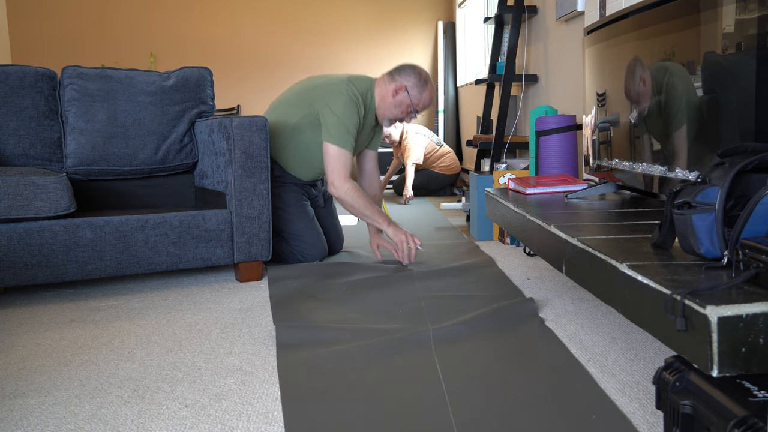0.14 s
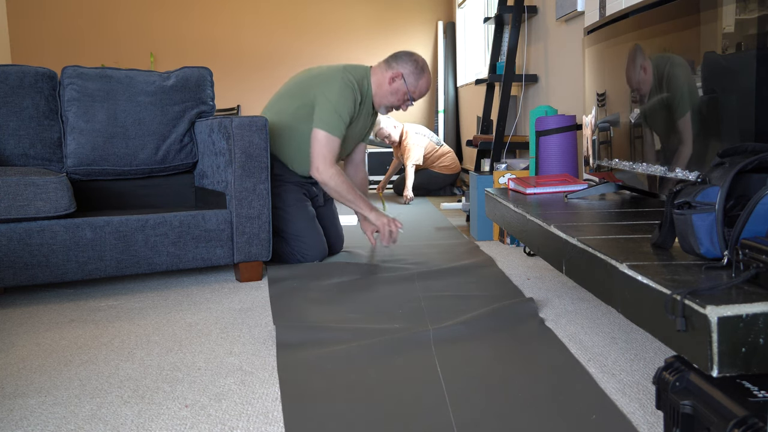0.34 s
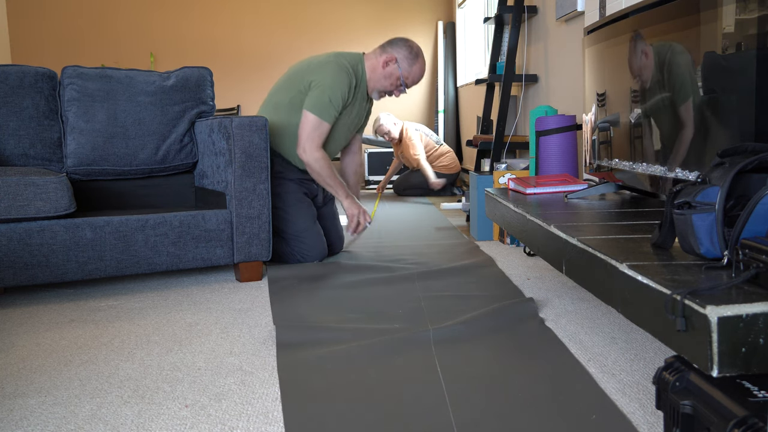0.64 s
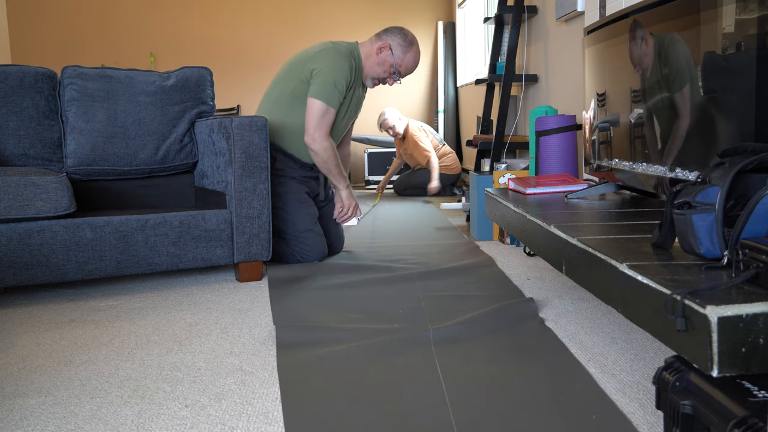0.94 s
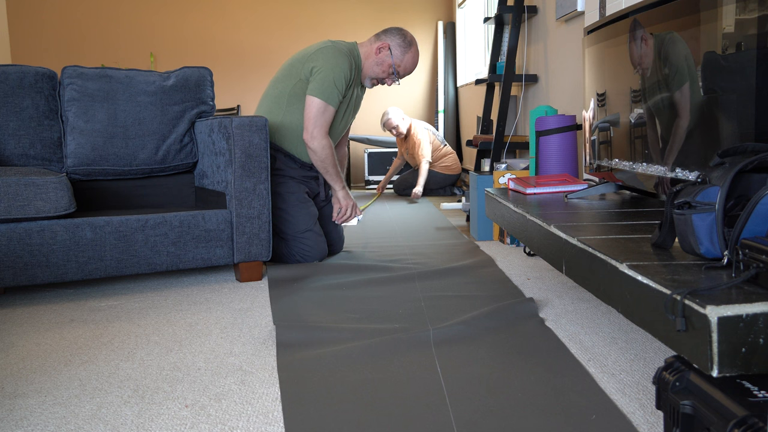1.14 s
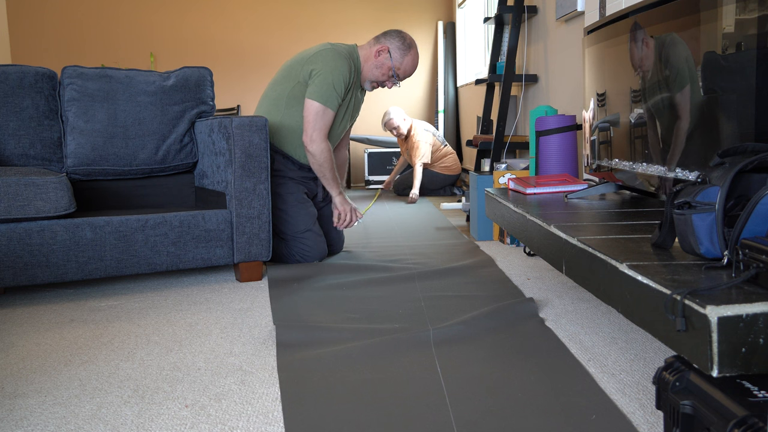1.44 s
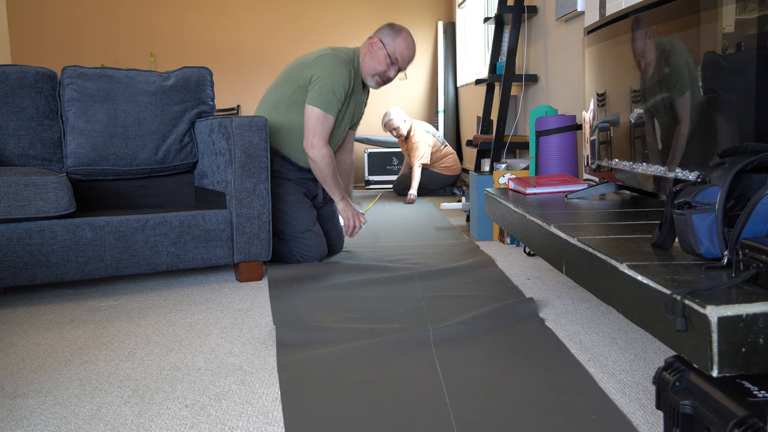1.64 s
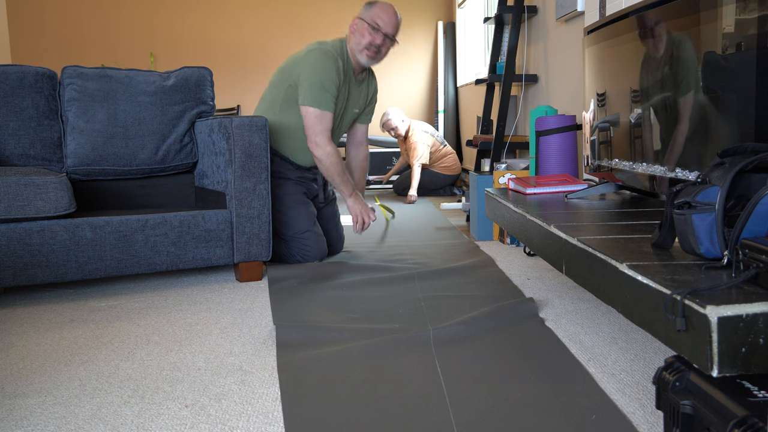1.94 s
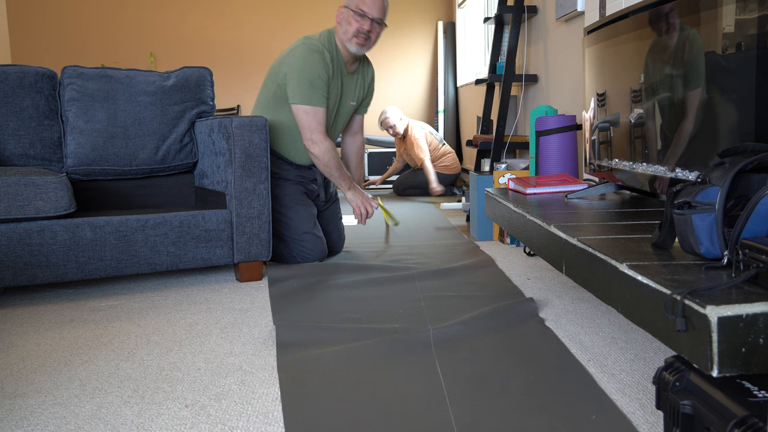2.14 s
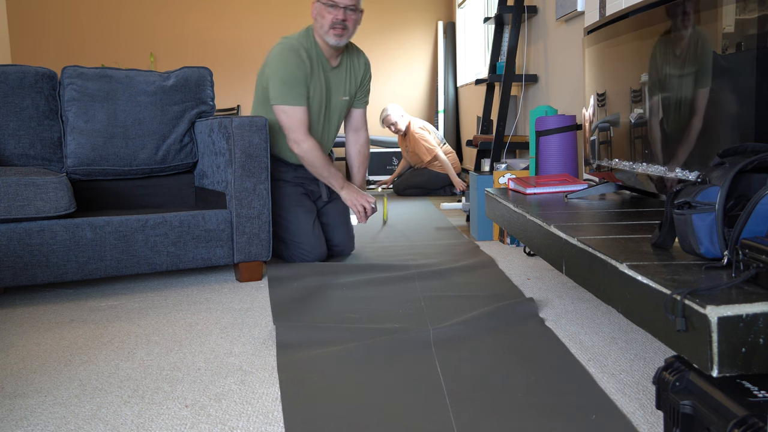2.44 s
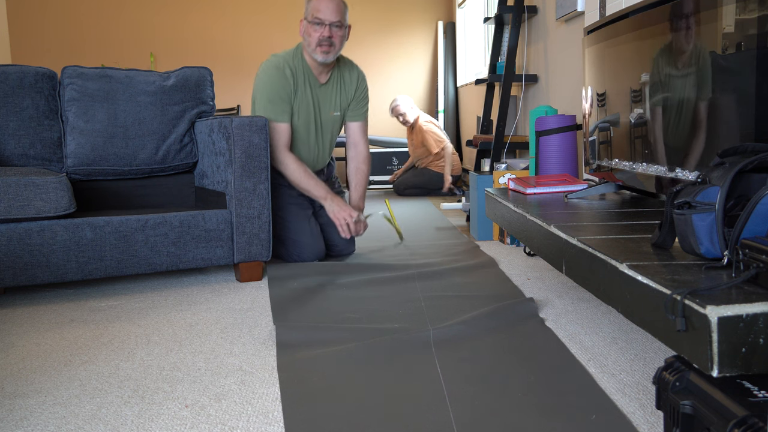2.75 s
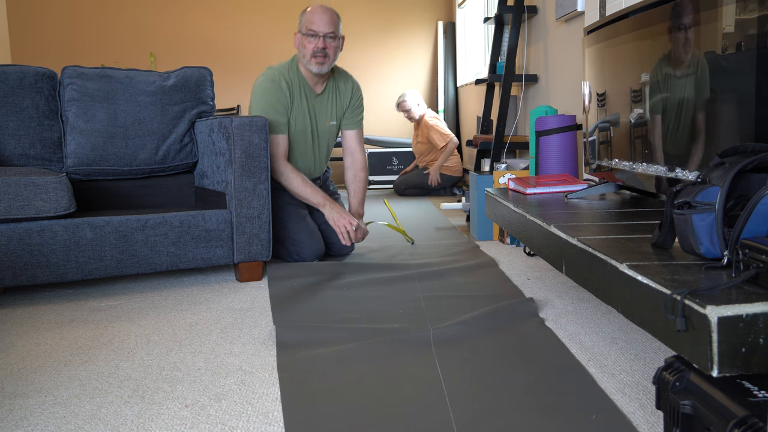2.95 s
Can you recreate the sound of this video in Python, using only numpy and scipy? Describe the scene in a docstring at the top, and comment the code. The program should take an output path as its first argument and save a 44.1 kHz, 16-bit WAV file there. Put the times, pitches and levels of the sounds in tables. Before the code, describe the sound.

Stiff canvas rustles close to the microphone in a furnished room, starting quietly, swishing sharply with a brief squeak, easing off, then crackling and scraping in repeated strong strokes before fading.

```python
"""Heavy, stiff canvas is handled on a living-room floor: first a few short rubs, one a strong bright swish.
Each is a dense run of tiny slips: low rub, scrape, bright crinkle and fine fizz (coloured noise and impulses),
with sharp noise-burst snaps. An early slide squeaks thinly: a sine in spurts. From 1.5 s on come full strokes
with much harder snaps. Throughout, soft scuffs and thin whistling rubs (swells of band noise) fall between them;
the furnished room answers over faint room noise."""
import sys
import numpy as np
from scipy import signal
from scipy.fft import rfft, irfft, next_fast_len
from scipy.io import wavfile
from scipy.ndimage import uniform_filter1d, minimum_filter1d, map_coordinates

SR = 44100
rng = np.random.default_rng(int(sys.argv[2]) if len(sys.argv) > 2 else 0)


def transcribe(u):
    """Save the signal u as a 16-bit wav file named by the first command-line argument.

    u: samples, shape (n,) or (channels, n), limited to [-1, 1]; the rate is SR.
    q: integer samples, one column per channel.
    """
    v = np.clip(np.atleast_2d(u).T, -1, 1)
    q = np.round(v * 32767).astype(np.int16)
    wavfile.write(sys.argv[1], SR, q)


N = 136710
FLUTTER_KNOTS_PER_S = 190  # shared by the grip and the squeak's shimmer
STFT_SAMPLES = 256


def amp(db):
    """Decibels to gain."""
    return 10 ** (np.asarray(db) / 20)


def unit(x):
    """Scale to rms 1."""
    return x / np.sqrt(np.mean(x ** 2) + 1e-20)


def along(points, hz):
    """Read (Hz, value) points on a log-frequency axis."""
    point_hz, values = np.transpose(points)
    return np.interp(np.log(hz + 1), np.log(point_hz + 1), values)


def curves(rows):
    """One value per sample for each column after the time."""
    times_s, *columns = np.transpose(rows)
    return [np.interp(np.arange(N) / SR, times_s, column) for column in columns]


def wobble(knots_per_s):
    """A smooth random curve through normally distributed knots."""
    knots = rng.standard_normal(N // 20)
    return map_coordinates(knots, [np.arange(N) * knots_per_s / SR], mode="wrap")


def swell(centre_s, width_s):
    """A smooth Gaussian rise and fall."""
    return np.exp(-.5 * ((np.arange(N) / SR - centre_s) / width_s) ** 2)


def filtered(x, response):
    """Multiply the zero-padded spectrum by a complex response of frequency."""
    size = 2 * next_fast_len(N)
    spectrum = rfft(x, size) * response(np.fft.rfftfreq(size, 1 / SR))
    return irfft(spectrum, size)[..., :N]


def coloured(x, colour):
    """Causal minimum-phase filter of unit power gain shaped by (Hz, dB) points."""
    def response(hz):
        cepstrum = irfft(np.log(unit(amp(along(colour, hz)))))
        half = len(cepstrum) // 2
        cepstrum[1:half] *= 2
        cepstrum[half + 1:] = 0
        return np.exp(rfft(cepstrum))
    return filtered(x, response)


def strokes():
    """Slips and smooth friction under an uneven grip sound in four registers."""
    # Each row: time in s, levels in dB of crinkle, scrape, fizz and low rub; one list per rub or stroke.
    short_rub_rows = [
        [(0.0, -47, -44.5, -54, -55.5), (0.072, -66, -54.5, -80, -57), (0.222, -43.5, -49, -40, -49),
         (0.305, -47.5, -47.5, -54, -59)],
        [(0.325, -18, -30, -21.5, -48.5), (0.398, -28.5, -37.5, -37, -50), (0.43, -25.5, -37.5, -27.5, -50),
         (0.53, -35.5, -44.5, -47, -51.5), (0.78, -48.5, -48, -56, -54.5)],
        [(0.84, -54, -59.5, -64, -81), (0.96, -46, -53.5, -50.5, -65), (1.06, -53.5, -59.5, -60, -81),
         (1.215, -49, -56, -53.5, -62)],
        [(1.29, -47, -43.5, -43, -67), (1.304, -28.5, -35, -31.5, -44), (1.35, -33.5, -39, -37, -48.5),
         (1.51, -40, -42, -61, -42.5)],
    ]
    stroke_rows = [
        [(1.535, -29, -33.5, -47, -52), (1.551, -26.5, -38, -45, -45), (1.585, -23.5, -35.5, -27, -43),
         (1.715, -23, -30.5, -30.5, -42.5), (1.781, -36.5, -37, -44, -47.5), (1.84, -43.5, -40, -48, -47.5)],
        [(1.875, -33, -42.5, -37.5, -50), (1.971, -29.5, -35.5, -30, -47), (2.019, -16, -31, -23, -41.5),
         (2.107, -16, -28, -21.5, -34.5), (2.163, -25, -35.5, -32.5, -46), (2.261, -38, -42, -43, -45.5),
         (2.352, -32.5, -40, -38, -49.5)],
        [(2.372, -23.5, -31.5, -33, -42), (2.432, -23, -29.5, -26.5, -39), (2.5, -24.5, -32.5, -30, -43),
         (2.522, -27, -34, -32, -56), (2.544, -18, -24.5, -20, -39.5), (2.624, -15.5, -26, -25.5, -38),
         (2.72, -25.5, -30, -37, -35.5)],
        [(2.76, -20, -26.5, -27, -35.5), (2.792, -14, -20.5, -19.5, -35.5), (2.86, -19.5, -23, -25, -43),
         (3.008, -42, -41.5, -52, -54), (3.026, -31, -41.5, -34, -47.5), (3.09, -26, -37, -31, -54)],
    ]
    # Register colours; each row: frequency in Hz, relative level in dB.
    crinkle = [(200, -82), (2500, -51), (4500, -7.5), (5800, -2.5), (7500, 0.5), (9000, 0), (10000, -5),
               (11200, -16), (15000, -16.5)]
    scrape = [(100, -67), (600, -32.5), (1200, -17.5), (1750, 0), (3200, 0), (4200, 2), (5100, 2),
              (6200, -5.5), (9000, -26.5)]
    fizz = [(200, -88), (7000, -47), (10000, -1.5), (14000, -6.5), (15800, -7)]
    low_rub = [(50, -75), (130, -38), (250, -17.5), (400, -5), (650, 5.5), (800, 3), (930, 7.5),
               (1250, 7.5), (1700, 12), (3000, -22)]
    smooth_db, grip_flutter_db, own_flutter_db = -3, 0.98, 0.8
    own_knots_per_s = 44.44

    levels_db = curves([row for stroke in [*short_rub_rows, *stroke_rows] for row in stroke])
    grip_db = grip_flutter_db * wobble(FLUTTER_KNOTS_PER_S)
    out = np.zeros(N)
    for level_db, colour in zip(levels_db, (crinkle, scrape, fizz, low_rub)):
        friction = slips() + amp(smooth_db) * rng.standard_normal(N)
        flutter_db = grip_db + own_flutter_db * wobble(own_knots_per_s)
        layer = coloured(friction * amp(flutter_db), colour)
        out += amp(level_db) * bending(layer)
    return out


def slips():
    """A dense random train of tiny slips: impulses of uneven size and random sign."""
    rate_per_s, spread_db = 2400, 1
    sizes = amp(spread_db * np.clip(rng.standard_normal(N), -2, 2))
    signs = rng.choice([-1, 1], N)
    return unit(sizes * signs * (rng.random(N) < rate_per_s / SR))


def bending(x):
    """The colour drifts in patches, and one resonance follows the bend of the material."""
    # Path of the resonance; each row: time in s, frequency in Hz.
    bend_path = [(.4, 7500), (.58, 10000), (.95, 9000), (1.15, 6840), (1.72, 6400), (1.88, 8400),
                 (2.09, 8500), (2.24, 9300), (2.38, 6900), (2.74, 6600), (2.9, 6200), (3.08, 8800)]
    bend_db, bend_octaves, patchy_db = 2.5, .16, 1

    hz, t, spectra = signal.stft(x, SR, nperseg=STFT_SAMPLES)
    patches = uniform_filter1d(rng.standard_normal(spectra.shape), 4, 0)
    patches = unit(uniform_filter1d(patches, 24, 1))
    resonance_hz = np.interp(t, *np.transpose(bend_path))
    octaves = np.log2((hz[:, None] + 1) / resonance_hz)
    gain_db = patchy_db * patches + bend_db * np.exp(-.5 * (octaves / bend_octaves) ** 2)
    return unit(signal.istft(spectra * amp(gain_db), SR, nperseg=STFT_SAMPLES)[1][:N])


def snaps():
    """Each snap of the stiff material is a bright noise burst with exponential decay."""
    # Each row: start in s, relative level in dB (trim_db is added).
    snap_rows = [(0.5545, -22), (0.641, -26), (0.68, -28), (0.777, -31), (1.1727, -31), (1.263, -23),
                 (1.3008, -12.5), (1.312, -16), (1.5275, -5), (1.5772, -4), (1.6162, -10), (1.6244, -4),
                 (1.711, -6), (2.0127, -6), (2.0977, -3), (2.366, -5), (2.5176, -3.5), (2.5387, -6),
                 (2.626, -3.5), (2.7382, -7.5), (2.8478, -6), (3.0245, -20.5)]
    # Snap colour; each row: frequency in Hz, relative level in dB.
    snap_colour = [(120, -84), (1500, -13), (4000, -8), (6000, 6.5), (7500, 10.5), (11000, -2),
                   (15500, -17)]
    trim_db, t60_s = -7.5, 0.041

    out = np.zeros(N + SR)
    t = np.arange(SR // 10) / SR
    for start_s, level_db in snap_rows:
        envelope = amp(level_db + trim_db - 60 * t / t60_s)
        out[round(start_s * SR):][:len(t)] += envelope * rng.standard_normal(len(t))
    return coloured(out[:N], snap_colour)


def squeak():
    """A sliding edge sticks and slips in spurts; its thin pitch starts sharp and settles."""
    # Each row: centre in s, half length in s, peak level in dB before shimmer.
    spurt_rows = [(.441, .014, -33), (.502, .017, -39), (.556, .014, -44.5), (.603, .009, -41),
                  (.668, .014, -47.5)]
    settled_hz, sharp_hz, settle_s = 1660, 30, .07
    jitter_ratio, jitter_knots_per_s, shimmer_db = 0.0022, 144, 1.5

    age_s = np.maximum(np.arange(N) / SR - spurt_rows[0][0], 0)
    hz = settled_hz + sharp_hz * np.exp(-age_s / settle_s)
    hz = hz * (1 + jitter_ratio * wobble(jitter_knots_per_s))
    phase = 2 * np.pi * np.cumsum(hz) / SR
    spurts = sum(amp(level_db) * swell(centre_s, width_s) for centre_s, width_s, level_db in spurt_rows)
    return np.sin(phase) * spurts * amp(shimmer_db * wobble(FLUTTER_KNOTS_PER_S))


def rubs(rows, width_octaves):
    """Each rub is a short swell of friction noise in a Gaussian band around its own pitch."""
    out = np.zeros(N)
    for centre_s, width_s, centre_hz, level_db in rows:
        def band(hz):
            return np.exp(-.5 * (np.log2((hz + 1) / centre_hz) / width_octaves) ** 2)
        friction = unit(filtered(rng.standard_normal(N), band))
        out += amp(level_db) * swell(centre_s, width_s) * friction
    return out


def scuffs():
    """Hands, knees and sliding canvas scuff and bump softly: broad bands of friction."""
    # Each row: centre in s, half length in s, centre frequency in Hz, level in dB.
    scuff_rows = [(0.093, 0.0045, 640, -51.5), (0.244, 0.004, 680, -43.5), (0.281, 0.002, 1510, -39.5),
                  (0.29, 0.0032, 820, -42.5), (0.43, 0.033, 5450, -33), (1.022, 0.0043, 2160, -45.5),
                  (1.25, 0.0088, 1770, -42.5), (1.25, 0.012, 4250, -39), (1.474, 0.017, 1800, -35.5),
                  (1.49, 0.05, 453, -54.5), (1.522, 0.003, 1360, -29.5), (2.5, 0.033, 265, -59),
                  (2.546, 0.0054, 1150, -28), (2.594, 0.016, 960, -33)]
    return rubs(scuff_rows, width_octaves=0.47)


def whistles():
    """A sliding edge whistles thinly: narrow bands of friction."""
    # Each row: centre in s, half length in s, centre frequency in Hz, level in dB.
    whistle_rows = [(.436, 0.033, 5100, -34.5), (.59, 0.09, 9750, -47.5), (1.13, 0.021, 7150, -50),
                    (1.265, 0.033, 7100, -43.5), (1.475, 0.019, 6100, -40), (2.27, 0.065, 9800, -39)]
    return rubs(whistle_rows, width_octaves=.055)


def room(x):
    """Quick reflections and a short tail, redrawn at random in overlapping pieces so no tone rings."""
    # Decay of the tail; each row: frequency in Hz, T60 in s.
    tail_t60 = [(300, 1), (3000, 0.5), (15000, 0.36)]
    tail_db, tail_rise_s = -9, 0.0061
    walls_db, walls_decay_s, walls_density = -4, 0.016, .06
    redraw_step_s = .08

    step, size = int(redraw_step_s * SR), SR // 3
    t = np.arange(size) / SR
    x = np.pad(x, (step, 2 * step))
    fade = np.sqrt(np.hanning(2 * step))
    out = np.zeros((2, N + SR))
    for start in range(0, N + step, step):
        hz, age_s, spectra = signal.stft(rng.standard_normal((2, size)), SR, nperseg=STFT_SAMPLES)
        decay = amp(-60 * age_s / along(tail_t60, hz)[:, None])
        tail = signal.istft(spectra * decay, SR, nperseg=STFT_SAMPLES)[1][:, :size]
        tail = tail * (1 - np.exp(-t / tail_rise_s))
        hits = rng.random((2, size)) < walls_density
        walls = rng.standard_normal((2, size)) * hits * np.exp(-t / walls_decay_s)
        answer = np.zeros((2, size))
        for level_db, part in ((tail_db, tail), (walls_db, walls)):
            answer += amp(level_db) * part / np.linalg.norm(part, axis=1, keepdims=True)
        piece = x[start:start + 2 * step] * fade
        echo = signal.fftconvolve(piece[None], answer, axes=1)
        out[:, start:start + echo.shape[1]] += echo
    return diffuse(out[:, step:step + N])


def diffuse(pair):
    """Mix two unrelated signals into a diffuse field whose left-right likeness varies with frequency."""
    # Each row: frequency in Hz, correlation of the two microphones from -1 to 1.
    likeness = [(120, 1), (300, 0.61), (1000, 0.23), (2300, 0.29), (7500, -0.58), (13000, -0.026)]

    def mid_side(hz):
        angle = np.arccos(np.clip(along(likeness, hz), -1, 1)) / 2
        return np.array([np.cos(angle), np.sin(angle)])
    mid, side = filtered(pair, mid_side)
    return np.array([mid + side, mid - side])


def room_noise():
    """Faint steady air of the room: coloured noise as a diffuse field."""
    # Each row: frequency in Hz, relative level in dB.
    air_colour = [(25, -49), (78, -1.5), (115, -9.5), (155, -3.5), (680, 13.5), (3000, 10), (15000, 3)]
    level_db = -52
    return amp(level_db) * diffuse(coloured(rng.standard_normal((2, N)), air_colour))


def scene():
    """The handling, slightly right of centre by arrival time, in the room and its faint noise."""
    # Each row: frequency in Hz, left minus right in dB.
    side_balance = [(1000, -0.2), (3000, 0), (8000, -1.5)]
    left_lag_s = .00001
    squeak_room_db = -11  # less room on the squeak keeps its thin tone steady

    handling = strokes() + snaps() + scuffs() + whistles()
    thin_squeak = squeak()
    sides = np.array([[.5], [-.5]])
    direct = filtered(handling + thin_squeak, lambda hz: np.exp(-2j * np.pi * hz * left_lag_s * sides))
    answer = room(handling + amp(squeak_room_db) * thin_squeak)
    heard = filtered(direct + answer, lambda hz: amp(sides * along(side_balance, hz)))
    return heard + room_noise()


def record(dry):
    """A quick limiter holds the peaks near its ceiling; nothing is kept above the band limit."""
    top_hz, ceiling = 15780, .95

    def passband(hz):
        return hz < top_hz
    x = filtered(dry, passband)
    needed = ceiling / np.maximum(np.abs(x).max(axis=0), ceiling)
    held = minimum_filter1d(needed, size=256)
    gain = uniform_filter1d(uniform_filter1d(held, size=128), size=128)
    return filtered(x * gain, passband)


dry = scene()
out = record(dry)
transcribe(out)
```